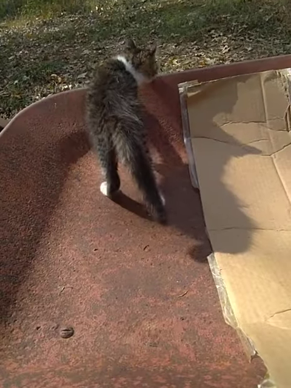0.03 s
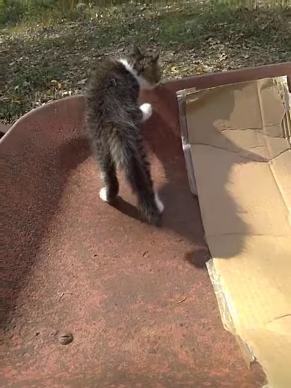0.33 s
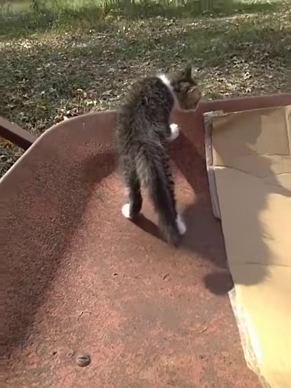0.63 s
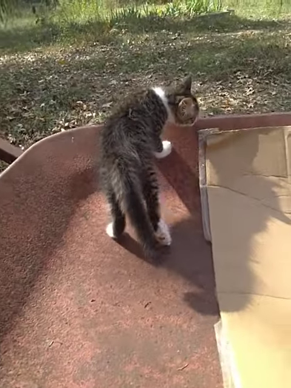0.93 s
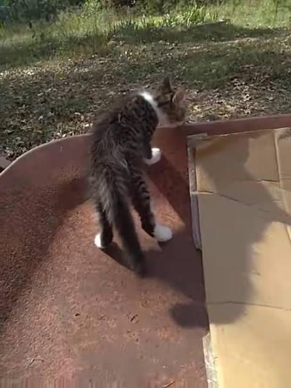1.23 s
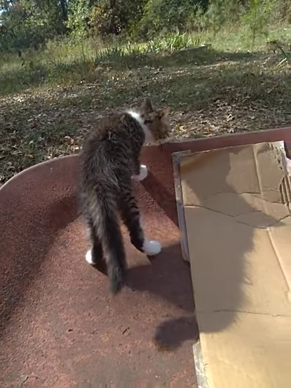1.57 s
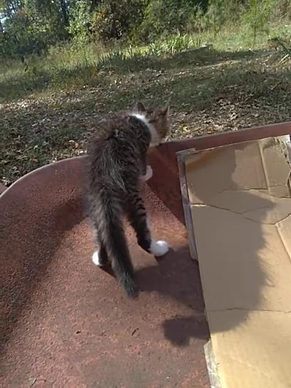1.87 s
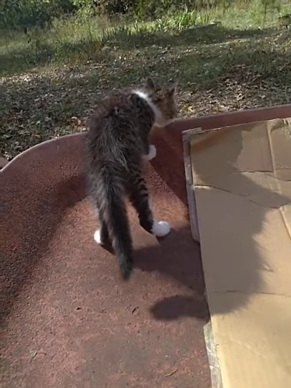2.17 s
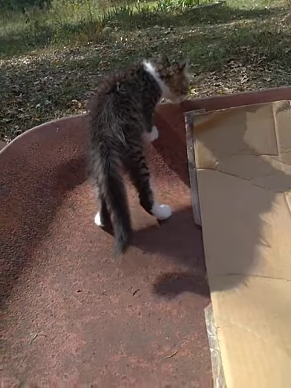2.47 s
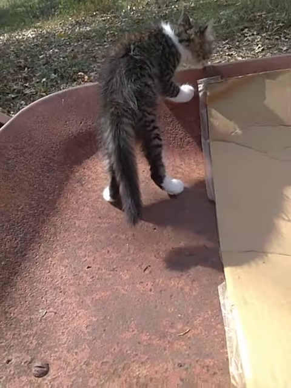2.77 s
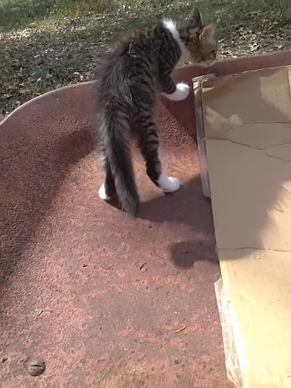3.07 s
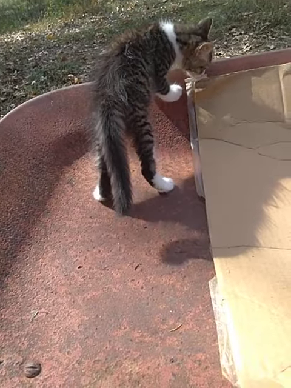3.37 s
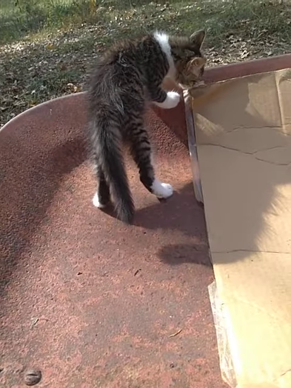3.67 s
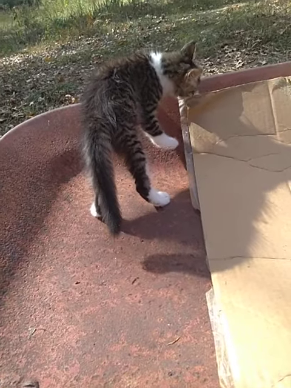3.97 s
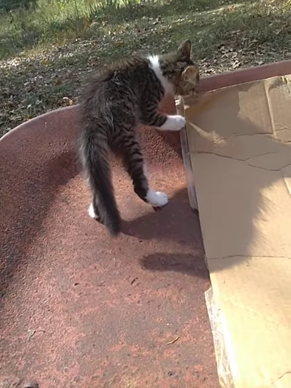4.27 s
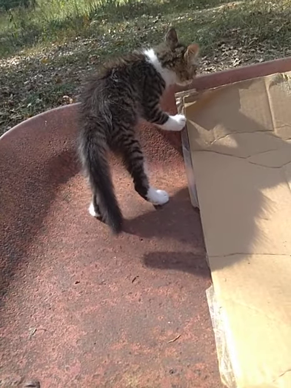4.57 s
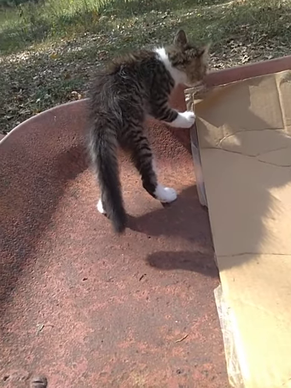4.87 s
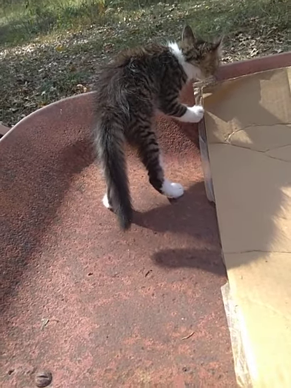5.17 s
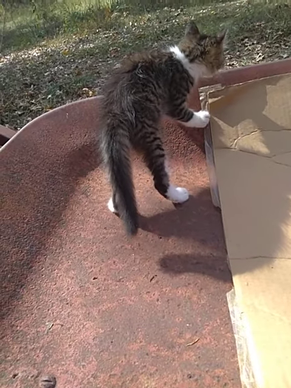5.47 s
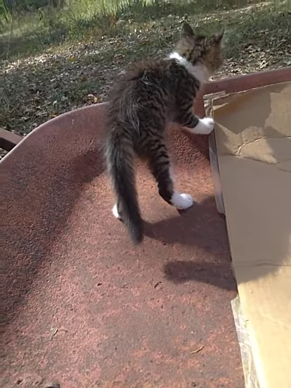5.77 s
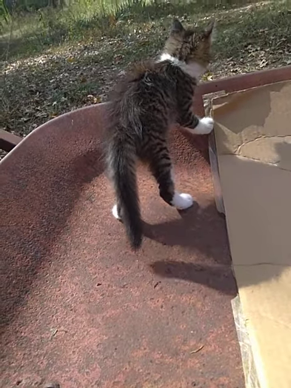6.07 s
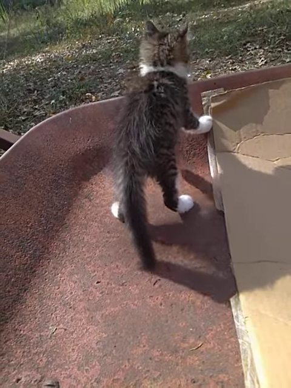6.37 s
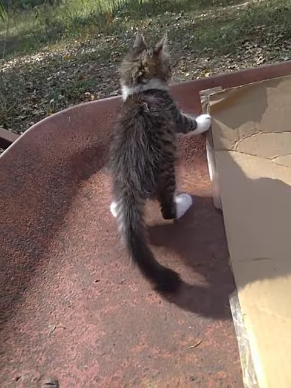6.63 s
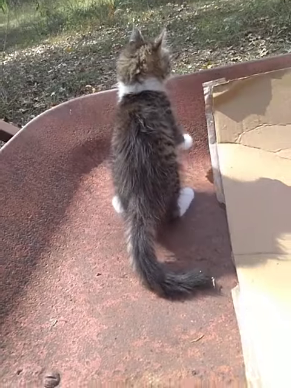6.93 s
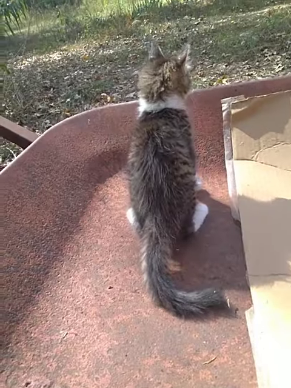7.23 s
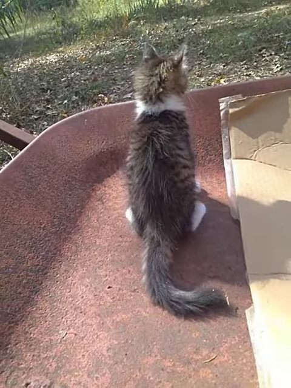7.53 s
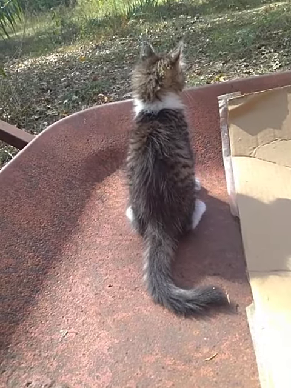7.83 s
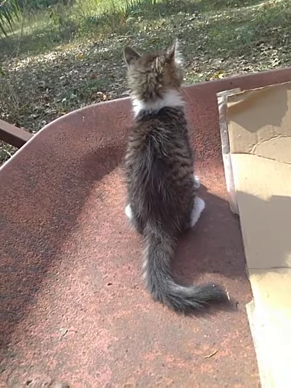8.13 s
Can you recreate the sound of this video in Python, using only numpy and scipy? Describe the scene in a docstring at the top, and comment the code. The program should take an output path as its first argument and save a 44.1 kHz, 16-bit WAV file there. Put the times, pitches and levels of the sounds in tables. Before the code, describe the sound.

A soft hiss of leaves and a low rumble of distant traffic run throughout, in wide outdoor stereo, with faint engine drones coming and going. A jay cries right at the start, again at 2.3 seconds and at 5.2 seconds. These are the loudest sounds: short, nasal, falling in pitch, ending in a rasp and echoing through trees. A far vehicle swells to about 4 seconds and slowly recedes. Close by, a kitten's paws faintly scuff cardboard at 0.5 seconds, then give light, sharp ticks around 4.3 and 6.8 seconds. A small bird adds thin, high chips near 1.8 and 4.6 seconds and a few more around 7. From 6.6 to 7.8 seconds a wren repeats one quick chirping phrase four times. The background lifts slightly with each loud call, then eases down.

```python
"""Jay at the edge of a wood

A jay gives three falling, nasal cries over a garden, a wren repeats one quick phrase four times and a
small bird chips high up; the trees scatter it all back. Close by, a kitten's paws tick and scuff on
cardboard. A far vehicle passes over road rumble, engine drones and a soft hiss of leaves. Cross-feed
widens the stereo; a noise suppressor lets the background up with each loud sound, then eases it down."""
import sys
import numpy as np
from scipy import signal
from scipy.fft import rfft, irfft
from scipy.io import wavfile
from scipy.ndimage import uniform_filter1d

SR = 44100
rng = np.random.default_rng(int(sys.argv[2]) if len(sys.argv) > 2 else 0)


def master(y):
    """Save y as 16-bit WAV."""
    cut = np.clip(np.atleast_2d(y).T, -1, 1)
    pcm = np.round(cut * 32767)  # scale
    wavfile.write(sys.argv[1], SR, pcm.astype(np.int16))


N = 361619
TIME = np.arange(N) / SR
BINS = np.fft.rfftfreq(N, 1 / SR)

# colour of tyres on a distant road: (frequency [Hz], relative level [dB])
TYRE_COLOUR = [(20, -50.5), (38, -16.5), (55, -2), (100, 1), (135, -4.5), (190, -2), (260, -3.5),
               (340, -11), (480, -24.5), (900, -46.5)]


def jay():
    """A harmonic cry that scoops up, swells as it sinks, and breaks into a rasp as it ends."""
    # (start [s], length [s], pitch factor, level [dB], swell [dB], overtone trim [dB], left lag [ms])
    cries = [(-.062, 0.34, 1.01, -38.5, 0, -4, 0.37), (2.318, 0.36, 1.008, -36.5, 4.5, -3.5, .34),
             (5.215, .362, .997, -34.5, 5.5, -4.5, 0.353)]
    # pitch contour of a cry: (share of its length, pitch [Hz])
    contour = [(0, 615.5), (.03, 795), (.09, 848), (.2, 845.4), (.45, 806), (.68, 763), (.87, 720.6),
               (1, 667.3)]
    # roughness through a cry: (share of its length, hoarseness [0-1])
    hoarseness = [(0, 1), (.04, .3), (.09, .03), (.4, .06), (.65, .12), (.83, .28), (.93, .9), (1, 1)]
    # throat resonances that weight the weaker harmonics: (frequency [Hz], relative level [dB])
    throat = [(800, -34), (1550, -12), (2150, -23.5), (2530, -13.5), (3400, -15), (3900, -34),
              (4250, -31.5), (4700, -15.5), (5600, -33), (7000, -17.5), (8300, -28), (9200, -28.5),
              (10200, -38), (13600, -45.5)]
    # colour of the rasp: (frequency [Hz], relative level [dB])
    rasp_colour = [(300, 0), (1400, 6), (2100, -51), (3000, 11.5), (4000, 10), (5200, 6), (7300, 3.5),
                   (9000, -5), (10200, -14.5), (14000, -17)]
    direct, cast = np.zeros((2, N)), np.zeros(N)
    jitter, flutter = .018 * wander(500), .3 * wander(260)
    scratch = colour(rng.standard_normal(N), rasp_colour)
    shimmer_db = [2 * wander(12) for _ in range(19)]
    waver_db = 1.6 * wander(30)  # the direct sound wavers on its way through the branches
    for start, length, factor, db, swell_db, overtone_db, lag_ms in cries:
        on = (TIME >= start) & (TIME < start + length)
        t = TIME[on]
        share = (t - start) / length
        hoarse = curve(hoarseness, share)
        hz = factor * curve(contour, share)
        phase = 2 * np.pi * np.cumsum(hz * (1 + hoarse * jitter[on])) / SR
        # the throat stays tuned to the fourth harmonic; the weak ones shimmer around it
        voice = np.sin(4 * phase)
        for k, own_db in enumerate(shimmer_db, start=1):
            if k != 4:
                voice += undb(curve(throat, k * hz) + overtone_db + own_db[on]) * np.sin(k * phase)
        rasp = undb(-16.5) * hoarse * scratch[on] * (1 + 0.24 * np.cos(phase))  # one puff a cycle
        attack = np.clip((t - start) / 0.012, 0, 1)
        release = np.clip((start + length - t) / .022, 0, 1)
        cry = np.zeros(N)
        cry[on] = voice * (1 + hoarse * flutter[on]) * release * attack + rasp * release ** .5
        cry[on] *= undb(db - swell_db * (1 - share) ** 2)
        direct += arrive(cry * undb(waver_db), lag_ms)
        cast += cry
    return direct + trees(cast, near_db=-12, near_t60=0.3, far_db=-16.5, far_t60=1.35, far_rise=0.03)


def wren():
    """One phrase rolled four times: a lead-in, then a rising, a level and a falling note."""
    # notes of the phrase, timed from the rising one:
    # (offset [s], length [s], first pitch [Hz], middle pitch [Hz], last pitch [Hz], level [dB])
    phrase = [(-.12, 0.027, 2092, 2255, 2560, -55.5), (-.098, 0.027, 2370, 2565, 2540, -48.5),
              (-.023, 0.022, 6220, 5720, 5720, -64), (0, 0.032, 3598, 3580, 4277, -44.5),
              (.057, .024, 2850, 2885, 2780, -44.5), (0.098, 0.0204, 3686, 2996, 3010, -46.5)]
    # repeats: (time of the rising note [s], pitch factor, gain [dB], extra gain on the lead-in [dB])
    repeats = [(6.625, 1.028, -2.5, -22), (6.977, 1.0, 4, -0.5), (7.328, 1.0, 1.5, 2), (7.688, 0.97, 0, 0)]
    notes = []
    for time, factor, gain_db, lead_db in repeats:
        for offset, length, first, middle, last, db in phrase:
            note_db = gain_db + db + lead_db * (offset < 0)
            notes.append((time + offset, length, factor * first, factor * middle, factor * last, note_db))
    song = whistles(notes, swell=0.8, overtone_db=-39)
    echoes = trees(song, near_db=-7.5, near_t60=0.61, far_db=-26.5, far_t60=1.0)
    return arrive(song, lag_ms=0.046) + echoes


def small_bird():
    """High chips from further off, each scooping up and levelling out."""
    # chips: (start [s], length [s], pitch factor, level [dB])
    calls = [(1.81, .026, 0.93, -69), (4.576, 0.014, 1.0, -57.5), (6.465, 0.037, 1.0, -72),
             (7.023, 0.035, .99, -65), (7.103, 0.029, 1.027, -55.5), (7.595, .032, .99, -66)]
    scoop_hz = np.array([6080, 7410, 7600])
    notes = [(start, length, *(factor * scoop_hz), db) for start, length, factor, db in calls]
    chips = whistles(notes, swell=0.42, overtone_db=-60)
    return arrive(chips, lag_ms=0.126) + trees(chips, near_db=-1, near_t60=0.34, far_db=-23, far_t60=.9)


def whistles(notes, swell, overtone_db):
    """Nearly pure bird notes, each bending through three pitches under an arched envelope."""
    out = np.zeros(N)
    for start, length, first, middle, last, db in notes:
        on = (TIME >= start) & (TIME < start + length)
        share = (TIME[on] - start) / length
        hz = np.polyval(np.polyfit([0, .5, 1], [first, middle, last], 2), share)
        phase = 2 * np.pi * np.cumsum(hz) / SR
        tone = np.sin(phase) + undb(overtone_db) * np.sin(2 * phase)
        out[on] += undb(db) * np.sin(np.pi * share) ** swell * tone
    return out


def paws():
    """Claws tick and pads scuff: short bursts of grains in the dead cardboard."""
    # paw touches: (time [s], level [dB], decay [s])
    touches = [(0.41, -58.5, 0.0047), (.48, -58, 0.05), (4.3002, -50.5, 0.0027), (4.3582, -43.5, 0.005),
               (4.385, -65, .02), (6.79, -60.5, 0.035), (6.846, -51, 0.0018), (6.87, -44, .0034),
               (6.879, -52, 0.0018)]
    # colour of the cardboard: (frequency [Hz], relative level [dB])
    cardboard = [(100, 0), (400, -1.5), (700, 9.5), (1000, 8), (1700, 5), (3000, 4), (5000, -0.5),
                 (8000, -7), (14000, -9)]
    force = np.zeros(N)
    for start, db, decay in touches:
        age = np.maximum(TIME - start, 0)
        # a claw bites at once; a long scuff starts softly
        press = 1 - np.exp(-age / (8 * decay ** 2 + decay / 20))
        force += undb(db) * press * (np.exp(-age / decay) + 0.071 * np.exp(-age / 0.021))
    grains = colour(force * rng.standard_normal((2, N)), cardboard)
    return arrive(grains[0], lag_ms=0.043) + grains


def trees(x, near_db, near_t60, far_db, far_t60, far_rise=0.022):
    """Echoes: near trunks answer at once, the wood behind them builds up and lingers."""
    t = TIME[:SR]
    scatter = rng.standard_normal((2, SR)) * undb(2.2 * rng.standard_normal(SR))
    near = unit(undb(-60 * t / near_t60) * (1 - np.exp(-(t / .007) ** 2)))
    far = unit(undb(-60 * t / far_t60) * (1 - np.exp(-(t / far_rise) ** 2)))
    echoes = unit(scatter) * (undb(near_db) * near + undb(far_db) * far) / np.sqrt(SR)
    return signal.fftconvolve(x[None], echoes, axes=1)[:, :N]


def vehicle():
    """A far pass-by: a narrow band of roar over broad tyre rumble, both weaker with distance."""
    # the roar shifts with the throttle: (time [s], centre frequency [Hz])
    roar_centre = [(2.2, 192.8), (4.05, 216.5), (4.67, 186), (5.11, 232), (6.26, 192.4), (6.31, 179.9),
                   (8.1, 211.8), (8.2, 179)]
    nearest_s, approach_s, recede_s = 3.77, 0.76, 1.59
    away = (TIME - nearest_s) / np.where(TIME < nearest_s, approach_s, recede_s)
    phase = 2 * np.pi * np.cumsum(curve(roar_centre, TIME)) / SR
    roar = (wander(62) * np.cos(phase) + wander(50) * np.sin(phase)) * undb(-57)
    rumble = colour(diffuse(alike_hz=600, apart=0.43), TYRE_COLOUR) * undb(-58)
    return (arrive(roar, lag_ms=-0.46) + rumble) / np.hypot(1, away)


def engines():
    """Far engines: low, unsteady drones that fade in, glide a little and fade out."""
    # drones: (start [s], length [s], first pitch [Hz], last pitch [Hz], level [dB])
    drones = [(-.2, 1.63, 64, 65.3, -66), (4.462, 1.54, 99, 93, -67), (5.85, 0.83, 89, 87.1, -59),
              (6.855, 0.69, 89, 93.3, -61)]
    fade_s = 0.16
    out = np.zeros(N)
    drift, throb = 1 + .012 * wander(4.6), undb(2 * wander(0.98))
    for start, length, first_hz, last_hz, db in drones:
        hz = np.interp(TIME, [start, start + length], [first_hz, last_hz]) * drift
        fade = np.clip(np.minimum(TIME - start, start + length - TIME) / fade_s, 0, 1)
        out += undb(db) * fade * np.sin(2 * np.pi * np.cumsum(hz) / SR)
    return arrive(out * throb, lag_ms=1.0)


def road():
    """A wide, restless bed of rumble from a distant road."""
    return colour(diffuse(alike_hz=660, apart=0.83), TYRE_COLOUR) * undb(-61.5 + 2.04 * wander(9.2))


def leaves():
    """Leaves all around blend into a soft, faintly flickering hiss."""
    # colour of the hiss: (frequency [Hz], relative level [dB])
    leaf_colour = [(100, -25.5), (400, -0.5), (650, -2), (1050, 1.5), (1500, -1), (2100, -4), (3000, -10),
                   (4200, -13.5), (5500, -15), (7500, -17.5), (10000, -21), (14000, -25)]
    return colour(diffuse(alike_hz=1200, apart=0.45), leaf_colour) * undb(-63.5 + .5 * wander(20))


def undb(db):
    """Decibels to gain."""
    return 10 ** (np.asarray(db) / 20)


def unit(x):
    """Scale to rms 1."""
    return x / np.sqrt(np.mean(x ** 2))


def curve(points, at):
    """Read a breakpoint curve, joined by straight lines."""
    return np.interp(at, *np.transpose(points))


def colour(x, points):
    """Equalise by (Hz, dB) points, keeping the power of white noise."""
    hz, db = np.transpose(points)
    gain = undb(np.interp(np.log(BINS + 1), np.log(hz), db))
    return irfft(rfft(x) * unit(gain), N)


def wander(rate_hz):
    """Smooth random motion of rms 1."""
    return unit(irfft(rfft(rng.standard_normal(N)) / (1 + (BINS / rate_hz) ** 4), N))


def arrive(x, lag_ms):
    """Pan by arrival time: the left microphone hears the sound lag_ms after the right."""
    turn = np.exp(-1j * np.pi * BINS * lag_ms / 1000)
    return irfft(rfft(x) * np.array([turn, turn.conj()]), N)


def diffuse(alike_hz, apart):
    """Noise from all around: the microphones agree on long waves only."""
    mid, side = rfft(rng.standard_normal((2, N)))
    alike = (1 - apart) / (1 + (BINS / alike_hz) ** 4)
    mid *= np.sqrt((1 + alike) / 2)
    side *= np.sqrt((1 - alike) / 2)
    return irfft([mid + side, mid - side], N)


def widen(x):
    """Cross-feed: each channel subtracts a late copy of the other, mostly in the midrange."""
    # (frequency [Hz], share fed across)
    feed = [(200, 0.15), (700, 0.78), (2100, 0.78), (4200, 0.5), (8000, 0.2), (14000, 0.0)]
    late = np.exp(-2j * np.pi * BINS * 21 / SR)  # 21 samples
    both = rfft(x)
    return irfft(both - curve(feed, BINS) * late * both[::-1], N)


def suppress(x):
    """Noise suppressor: any loud sound above the bass opens the gain, which then sinks back steadily."""
    threshold_db, knee_db, depth_db, open_s, close_s = -52.5, 13.5, 5, 0.057, 1
    sidechain = signal.sosfilt(signal.butter(2, 600, "high", fs=SR, output="sos"), x)
    power = uniform_filter1d(np.mean(sidechain ** 2, axis=0), size=220)
    level_db = 10 * np.log10(np.abs(power) + 1e-12)
    wanted = np.clip((level_db - threshold_db) / knee_db, 0, 1)
    held = np.maximum.accumulate(wanted + TIME / close_s) - TIME / close_s
    pole = np.exp(-1 / (open_s * SR))
    opening = signal.lfilter([1 - pole], [1, -pole], held)
    return x * undb(depth_db * (opening - 1))


def scene():
    """Birds and paws over a bed of leaves and far traffic, in stereo."""
    return jay() + wren() + small_bird() + paws() + road() + leaves() + vehicle() + engines()


def record(dry):
    """Widen the stereo, turn the quiet stretches down and cut the top steeply."""
    high_cut = signal.ellip(10, .2, 70, 14300, fs=SR, output="sos")
    return signal.sosfilt(high_cut, suppress(widen(dry)))


dry = scene()
out = record(dry)
master(out)
```